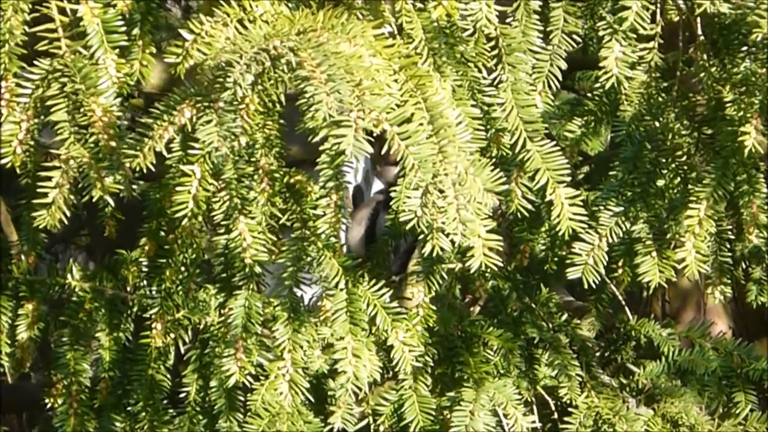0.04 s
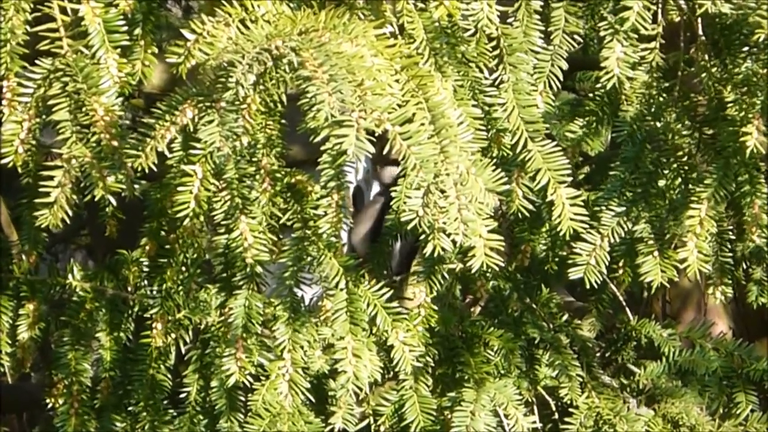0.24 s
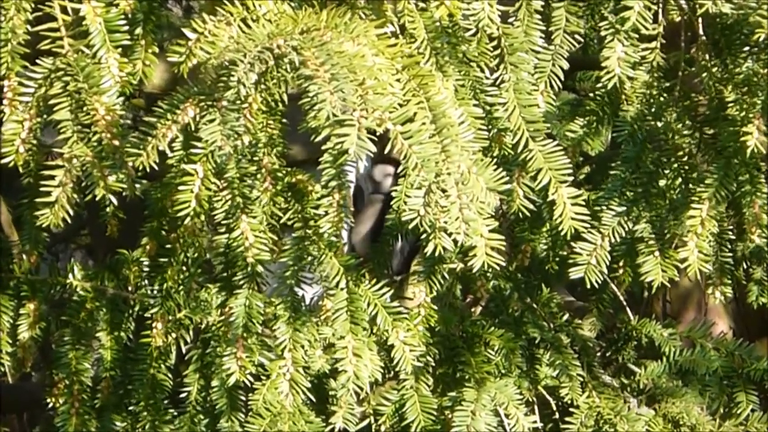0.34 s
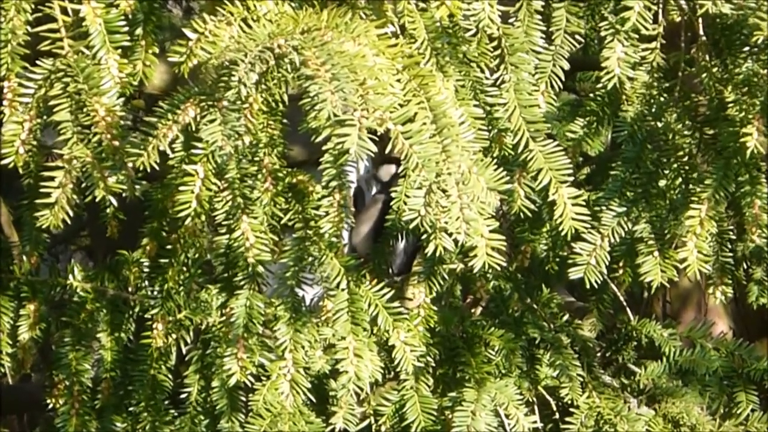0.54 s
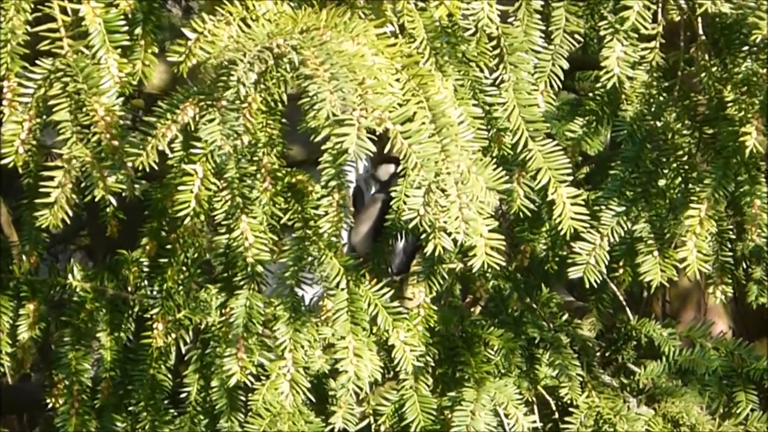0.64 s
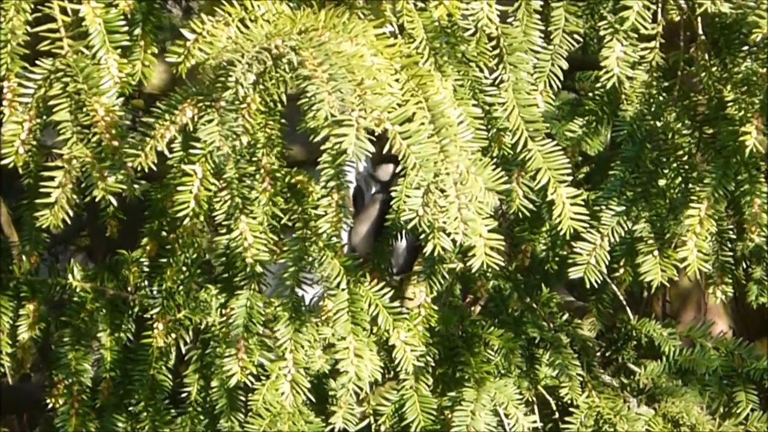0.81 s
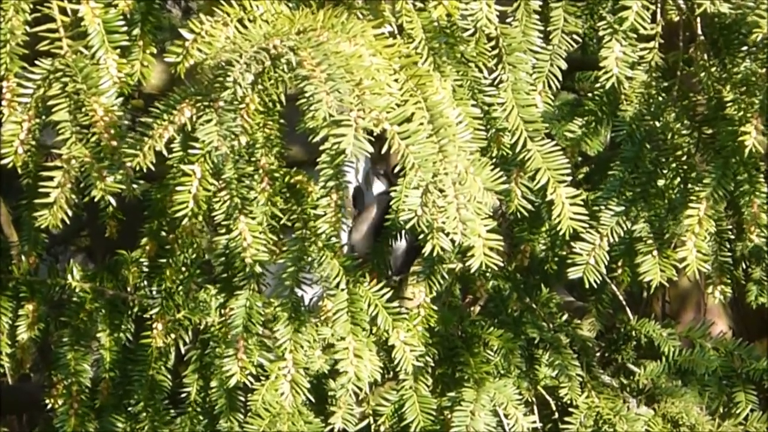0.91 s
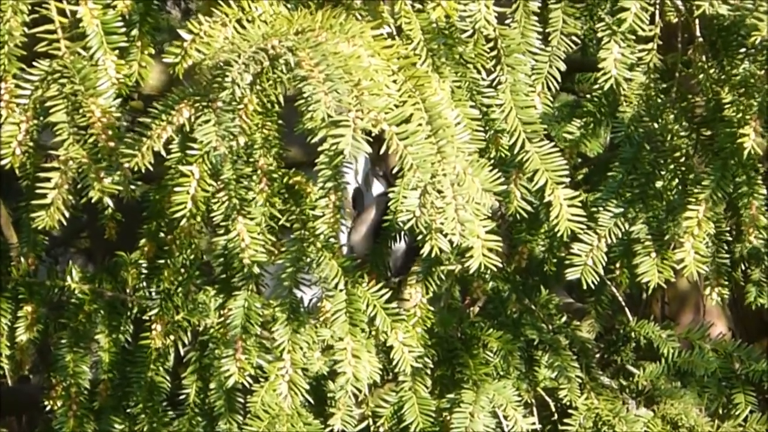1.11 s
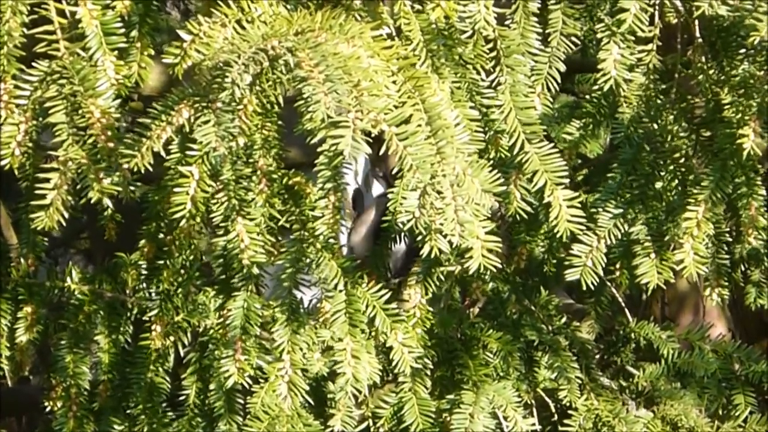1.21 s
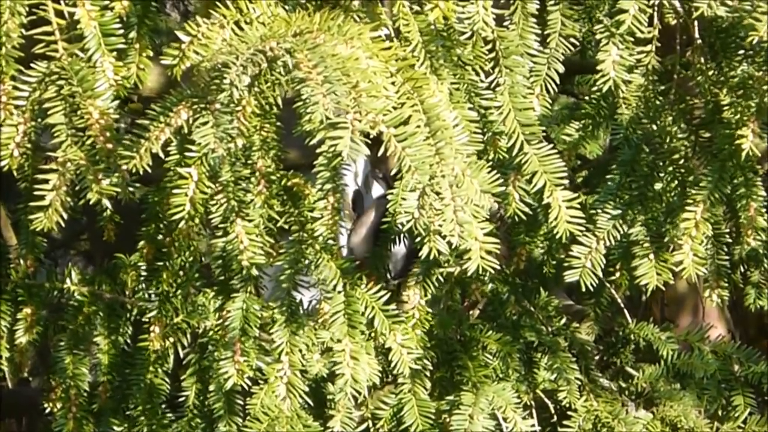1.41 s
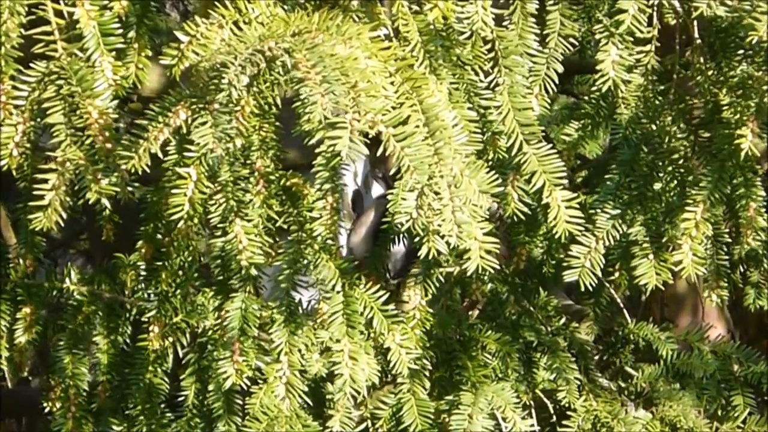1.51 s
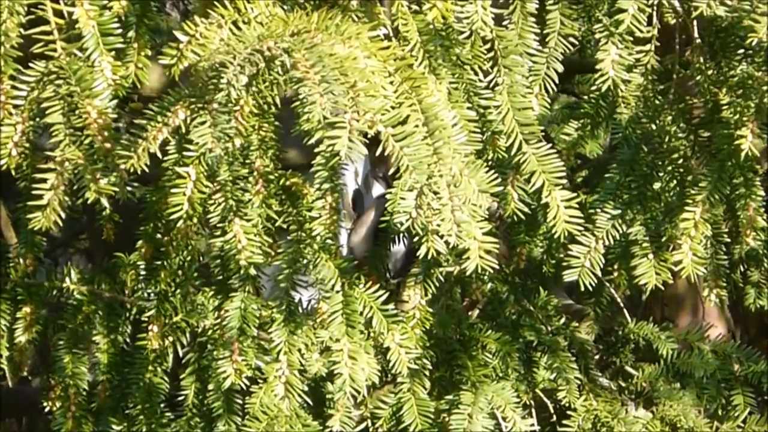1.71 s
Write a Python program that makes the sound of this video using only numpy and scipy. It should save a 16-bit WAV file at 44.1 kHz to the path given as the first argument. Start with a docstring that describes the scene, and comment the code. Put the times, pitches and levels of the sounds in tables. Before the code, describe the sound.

One rapid, fading roll of woodpecker knocks on wood, with faint birds further off.

```python
"""A woodpecker drums one roll on a tree near the microphone: eighteen pecks that speed up and fade.
Every peck rings the same damped modes of the wood; nearby surfaces throw it back, the foliage
scatters it and the trees add a short tail. Small birds whistle further off. Behind them lie a low
outdoor murmur, a faint far-off drone and a few soft bumps close by."""
import sys
import numpy as np
from scipy import signal
from scipy.fft import rfft, irfft
from scipy.io import wavfile
from scipy.ndimage import uniform_filter1d

SR = 44100
rng = np.random.default_rng(int(sys.argv[2]) if len(sys.argv) > 2 else 0)


def pcm_store(signal):
    """Save signal as 16-bit PCM."""
    levels = np.round(np.clip(np.atleast_2d(signal), -1, 1) * 32767)
    wavfile.write(sys.argv[1], SR, levels.astype(np.int16).T)


N = 77175
TIME = np.arange(N) / SR


def undb(db):
    """Decibels to gain."""
    return 10 ** (np.asarray(db) / 20)


def pan(db):
    """Channel gains that put the left db above the right."""
    return undb(np.array([[db], [-db]]) / 2)


def fade(t, t60):
    """Decay by 60 dB in t60."""
    return np.exp(-np.log(1000) * t / t60)


def colour(x, points):
    """Filter by a curve of (frequency [Hz], gain [dB]) points."""
    hz, db = np.array(points).T
    f = np.maximum(np.fft.rfftfreq(x.shape[-1], 1 / SR), 1)
    gain = undb(np.interp(np.log(f), np.log(hz), db))
    return irfft(rfft(x) * gain, x.shape[-1])


def convolve(x, response):
    """Play x through a stereo response."""
    return signal.fftconvolve(np.atleast_2d(x), response, axes=1)[:, :N]


def wander(rate_hz):
    """Smooth random drift with a spread of 1."""
    span = max(int(SR / rate_hz), 1)
    drift = uniform_filter1d(uniform_filter1d(rng.standard_normal(N), span), span)
    return drift / drift.std()


def scatter(t60_s, build_s):
    """Countless small reflections that build up and die away; unit energy per channel."""
    swell = 1 - np.exp(-(TIME / build_s) ** 2)
    response = rng.standard_normal((2, N)) * fade(TIME, t60_s) * swell
    return response / np.sqrt(np.sum(response ** 2) / 2)


# spectrum of the distant murmur (frequency [Hz], relative level [dB])
MURMUR_SPECTRUM = [(25, -17), (55, -14), (100, -2.5), (210, 3), (330, -1.5), (560, -4.5), (715, 2),
                   (850, -10.5), (1200, -9), (1750, -12), (2800, -12.5), (4000, -16), (5200, -31),
                   (7300, -41), (9000, -49), (10500, -44), (15500, -58.5)]
# its width at the microphone (frequency [Hz], side minus mid [dB])
MURMUR_WIDTH = [(30, -4.5), (120, -15.5), (350, -14.5), (800, 7), (2000, 2), (10000, -6)]
# an early dip in its level (time [s], level [dB])
MURMUR_DIP = [(.14, 1), (.2, -1), (1.15, -0.5), (1.25, -0.5)]
def murmur(level_db=-46, waver_db=1.5):
    """Distant outdoor noise, narrow in the bass and wider above, wavering slightly."""
    mid, side = colour(rng.standard_normal((2, N)), MURMUR_SPECTRUM)
    air = mid + np.array([[1], [-1]]) * colour(side, MURMUR_WIDTH)
    dip_db = np.interp(TIME, *np.array(MURMUR_DIP).T)
    gain = undb(level_db + dip_db + waver_db * wander(rate_hz=12))
    return gain * pan(-1.5) * air / air.std()


def drone(pitch_hz=714, level_db=-57.5):
    """A faint far-off tone that wavers in pitch and level."""
    hz = pitch_hz * (1 + 0.012 * wander(rate_hz=40))
    gain = undb(level_db + 3 * wander(rate_hz=15))
    return gain * np.sin(2 * np.pi * np.cumsum(hz) / SR)


# whistles further off, right of the microphone (time [s], length [s], start pitch [Hz],
# middle pitch [Hz], end pitch [Hz], level [dB], warble [share of pitch])
BIRD_NOTES = [(0.046, 0.086, 4000, 3860, 3960, -58.5, 0.0038), (0.164, .062, 7800, 6150, 5690, -65, 0.005),
              (.205, 0.12, 5680, 5910, 6480, -61, .006), (0.329, 0.14, 6610, 6730, 6150, -71.5, 0.038),
              (0.673, 0.1, 3430, 3410, 3420, -51.5, 0.0044), (1.3, 0.049, 6420, 5980, 5600, -72, .035),
              (1.338, 0.037, 2560, 2830, 2550, -56, .003), (1.381, 0.083, 2630, 2570, 2530, -59.5, .006),
              (1.442, .035, 5220, 4730, 4270, -66.5, .02), (1.465, 0.0363, 4370, 4030, 3660, -51, .003),
              (1.499, 0.08, 4880, 4630, 4710, -54.5, 0.0393), (1.554, 0.018, 3970, 4084, 3990, -49.5, .005),
              (1.578, .095, 3690, 3505, 3520, -45, 0.0115), (1.692, 0.067, 3483, 3485, 3560, -53, .005)]
def birds(tail_db=-0.5):
    """Thin whistles that glide through three pitches and linger among the trees."""
    song = np.zeros(N)
    for at, length, start, middle, end, db, warble in BIRD_NOTES:
        progress = np.clip((TIME - at) / length, 0, 1)
        glide = np.polyfit([0, 0.5, 1], [start, middle, end], 2)
        hz = np.polyval(glide, progress) * (1 + warble * wander(rate_hz=900))
        arch = 2 * np.sqrt(progress * (1 - progress))
        song += undb(db) * arch * np.sin(2 * np.pi * np.cumsum(hz) / SR)
    tail = convolve(song, scatter(t60_s=0.5, build_s=0.0096))
    return pan(-6) * (song + undb(tail_db) * tail)


# soft low bumps near the microphone (time [s], centre [Hz], level [dB])
NEAR_BUMPS = [(.09, 300, -53.5), (0.454, 90, -53), (.66, 100, -50), (.76, 75, -50.5), (1.703, 330, -41)]
def bumps(t60_s=0.11, rise_s=0.0023):
    """Brief dull thuds of noise, each about an octave wide."""
    thuds = np.zeros(N)
    for at, hz, db in NEAR_BUMPS:
        band = [(hz / 4, -24), (hz, 0), (hz * 2, -10), (hz * 8, -60)]
        noise = colour(rng.standard_normal(N), band)
        age = np.maximum(TIME - at, 0)
        envelope = fade(age, t60_s) * (1 - np.exp(-age / rise_s))
        thuds += undb(db) * envelope * noise / noise.std()
    return thuds


# crack of the beak on the tree (frequency [Hz], relative level [dB])
CRACK_SPECTRUM = [(300, -8), (1200, 1), (2000, 2), (3200, 2), (4400, -15), (5500, -25.5), (7500, -29),
                  (9000, -43.5), (10800, -30.5), (15000, -54.5)]
def beak_crack(level_db=-32.5, t60_s=0.055, rise_s=0.00076):
    """The beak lands with a brief burst of noise, slightly to the right."""
    noise = colour(rng.standard_normal((2, N)), CRACK_SPECTRUM)
    envelope = fade(TIME, t60_s) * (1 - np.exp(-TIME / rise_s))
    return undb(level_db) * pan(-2.5) * envelope * noise / noise.std()


# modes of the wood as they reach the microphone (frequency [Hz], gain [dB], t60 [ms],
# build-up [ms], left minus right [dB], onset [ms], left behind right [ms])
WOOD_MODES = [(471, -19.5, 17.5, 0.3, 0, 1.21, -0.03), (508.8, -41, 97, 0.3, -0.5, 2.5, 0.04),
              (650, -28, 150, 5.0, -2, 2.2, 0.06), (778.4, -7, 28.3, 1.13, 1.5, 0.11, 0.11),
              (965, 10, 10.07, 4, 3, 1.47, 0.07), (1102, -25.5, 147, 1.5, -7, 3.5, -0.06),
              (1477, -16, 31.2, 0.23, 2, 0.0, 0.06), (1740, -0.63, 20.9, 2.33, -9, 0.9, 0.09),
              (1828, -20.5, 51, 0.76, -13.5, 2.1, 0.051), (2211, -24, 79, 1.3, -11, 1.32, 0.09),
              (2480, -29.5, 39, 0.5, -4.5, 1.1, 0.053), (3005, -8.5, 5.9, 1.57, -1, 1.58, 0.051),
              (3226, -43, 120, 1.1, -9, 0.9, -0.0), (3463, -26, 19, 4.6, -6, 3.5, -0.03),
              (3980, -31, 19.5, 0.7, -10, 1.0, -0.02), (4200, -20.5, 5.6, 1.6, -9, 1.24, -0.041)]
def wood_ring():
    """The struck wood's damped modes swell and die."""
    ring = np.zeros((2, N))
    for hz, db, t60, rise, side, onset, lag in WOOD_MODES:
        age_ms = np.maximum(1000 * TIME - onset - lag * np.array([[0.5], [-0.5]]), 0)
        swing = np.sin(2 * np.pi * hz * age_ms / 1000)
        envelope = fade(age_ms, t60) * (1 - np.exp(-(age_ms / rise) ** 2))
        ring += undb(db) * pan(side) * envelope * swing
    return ring


# echoes off nearby surfaces (delay [ms], level [dB], dull above [Hz], left minus right [dB])
NEAR_ECHOES = [(4.566, -21, 5000.0, -6.5), (6.777, -17.5, 3200, -2), (9.376, -5.5, 640, 0),
               (15.743, -9.5, 1300, 3), (17.185, -13, 1300, -4), (18.38, -19, 3520.0, 6),
               (19.717, -7.5, 1010.0, -4.5), (25.28, -10.5, 800, -2.5), (29.866, -9, 694, -1.5),
               (31.11, -9.0, 730, 1.5), (37.87, -14.1, 600.0, 2.5), (40.61, -18, 1280.0, 2),
               (52.3, -22, 1590.0, 2), (66.59, -11, 720.0, 2.5)]
# colour of the scatter from the foliage (frequency [Hz], gain [dB])
FOLIAGE_COLOUR = [(600, -4), (1000, -9.5), (1800, -1), (3200, 6), (4400, 1)]
def surroundings(direct, foliage_db=-16.5, tail_db=-21):
    """The direct sound, then dull echoes, bright scatter from foliage and the tail of the trees."""
    f = np.fft.rfftfreq(2 * N, 1 / SR)
    paths = 0
    for ms, db, dull_hz, side in NEAR_ECHOES:
        delay = np.exp(-2j * np.pi * f * ms / 1000)
        lowpass = 1 / np.hypot(1, (f / dull_hz) ** 2)
        paths += undb(db) * pan(side) * delay * lowpass
    echoes = irfft(rfft(direct, 2 * N) * paths)[:, :N]
    foliage = convolve(direct, scatter(t60_s=0.088, build_s=0.0033))
    foliage = colour(foliage, FOLIAGE_COLOUR)
    tail = convolve(direct, scatter(t60_s=0.94, build_s=0.068))
    tail = colour(tail, [(500, 3.5), (900, 2.5), (1800, 1.5), (4000, 0)])
    return direct + echoes + undb(foliage_db) * foliage + undb(tail_db) * tail


# pecks of the roll on the nearby tree (time [s], relative level [dB])
DRUM_ROLL = [(0.2202, -0.5), (0.2771, 0), (0.3307, -0.44), (0.3814, -1), (.4309, -1.6), (.478, -2),
             (0.525, -2.5), (.571, -3), (0.6151, -3), (.659, -4), (0.7016, -5.5), (0.7418, -5.5),
             (0.782, -7), (.822, -9), (0.8612, -12.5), (.8968, -11), (.9318, -19.5), (0.9761, -23.5)]
def woodpecker(low_cut_hz=383):
    """The beak strikes the same spot again and again; the wood radiates little bass."""
    blows = np.zeros(N)
    for at, db in DRUM_ROLL:
        blows[int(at * SR)] += undb(db)
    low_cut = signal.butter(4, low_cut_hz, "high", fs=SR, output="sos")
    peck = signal.sosfilt(low_cut, beak_crack() + wood_ring())
    return convolve(blows, surroundings(peck))


def scene():
    """Background, birds and drumming meet at a stereo microphone among the trees."""
    return murmur() + drone() + birds() + bumps() + woodpecker()


def record(dry, top_hz=15500):
    """The recorder cuts the very top."""
    return signal.sosfilt(signal.ellip(8, 0.2, 70, top_hz, fs=SR, output="sos"), dry)


dry = scene()
out = record(dry)
pcm_store(out)
```